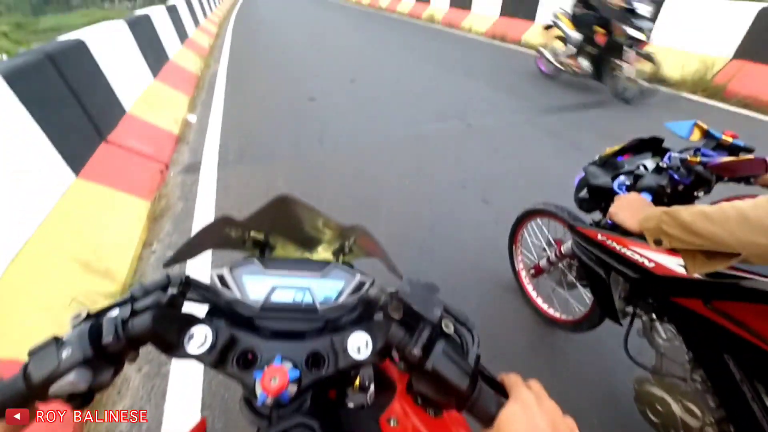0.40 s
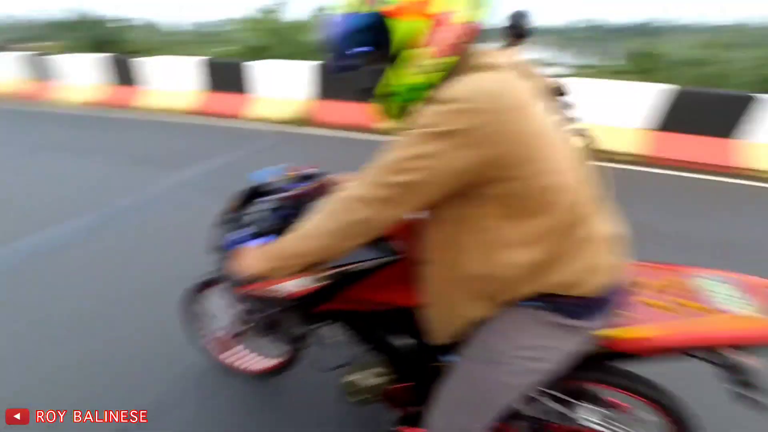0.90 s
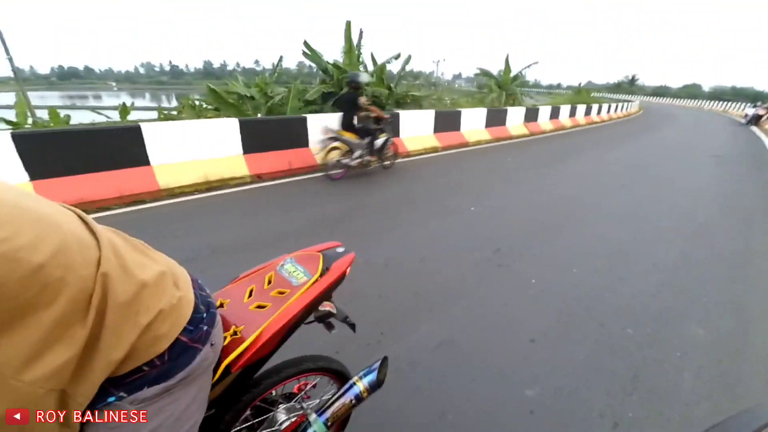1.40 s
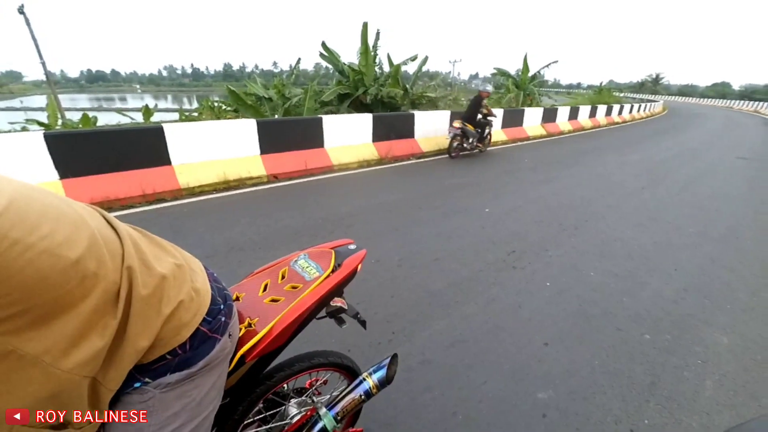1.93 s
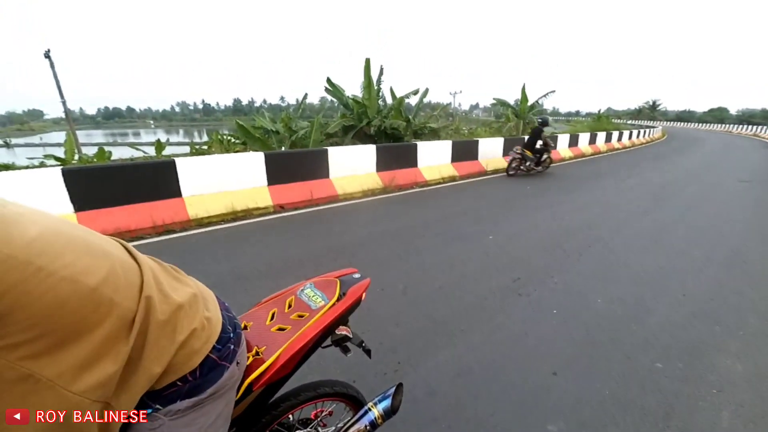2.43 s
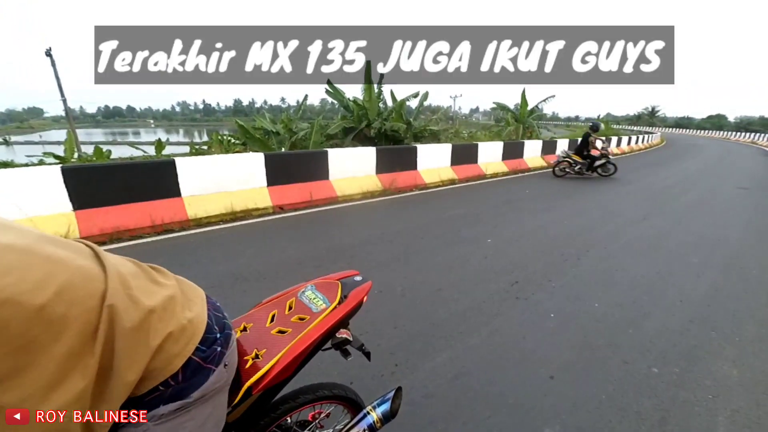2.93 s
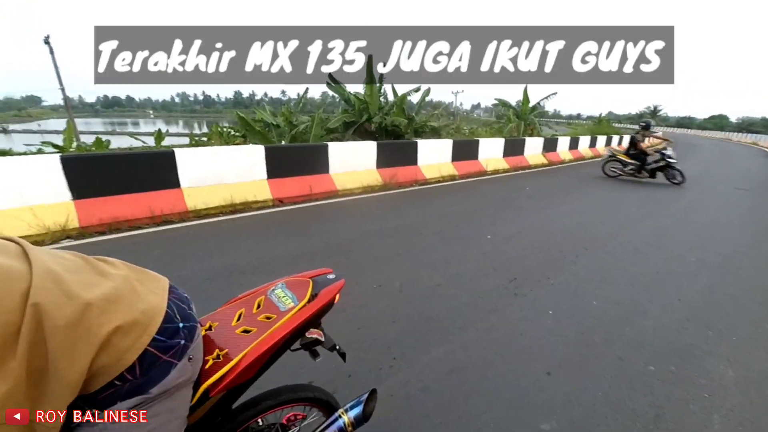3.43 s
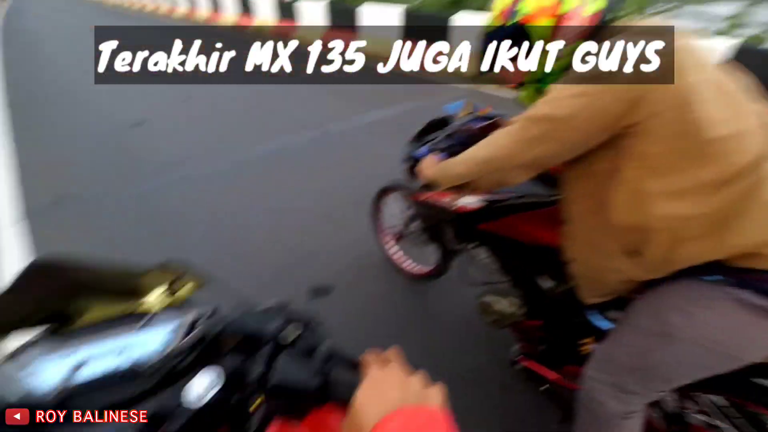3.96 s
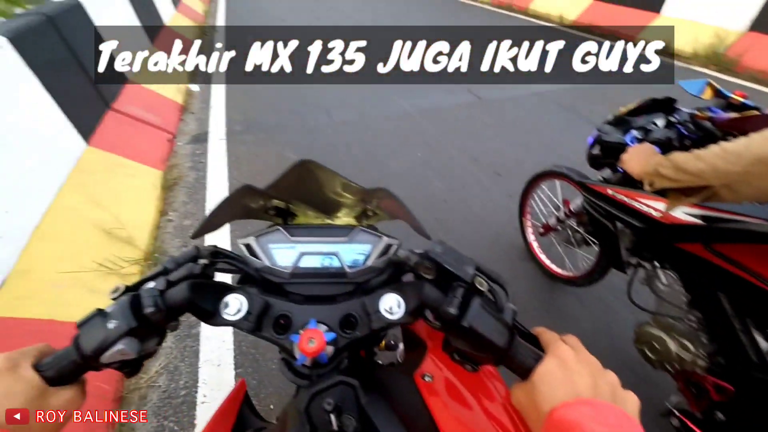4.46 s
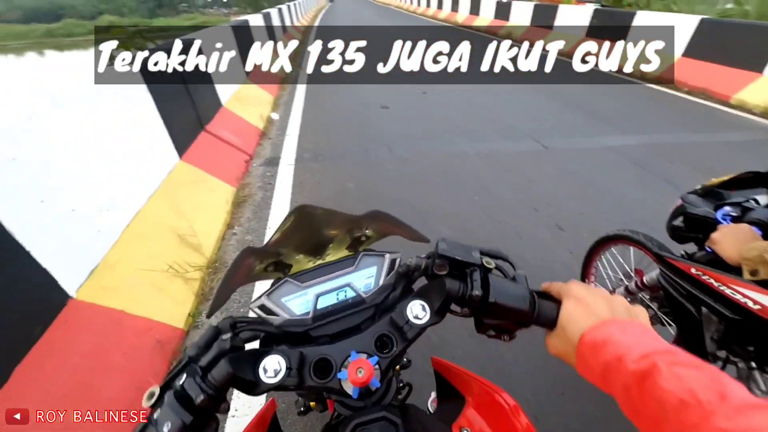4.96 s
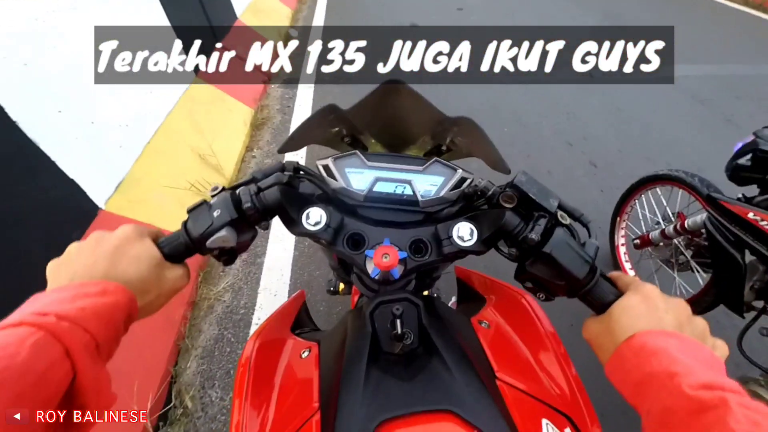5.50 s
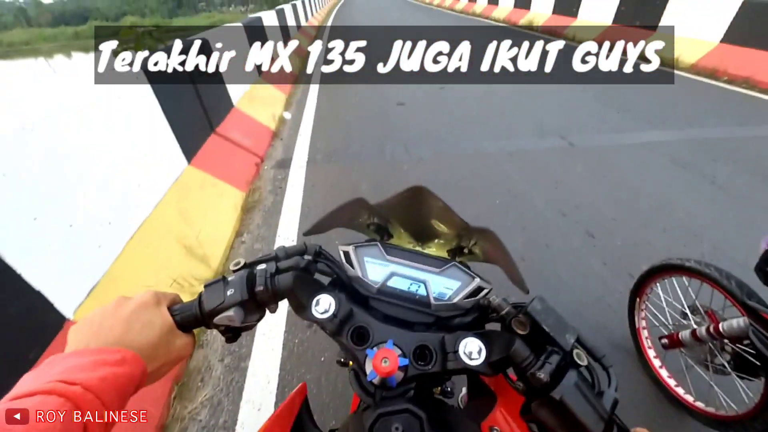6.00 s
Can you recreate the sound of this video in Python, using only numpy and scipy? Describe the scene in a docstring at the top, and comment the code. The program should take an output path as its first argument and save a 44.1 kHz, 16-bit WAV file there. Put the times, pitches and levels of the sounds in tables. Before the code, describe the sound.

Low throaty motorcycle idling beside a rougher second engine that snaps out loud exhaust barks early and midway, over light mechanical ticking.

```python
"""Two idling motorcycles on an open road

Two single-cylinder motorcycles wait side by side, heard from a helmet that turns about. One fires evenly:
pressure pulses ring its pipe and silencer chamber. The other coasts on weak uneven firings that stir its muffler,
and barks when its throttle is blipped. Chords of engine orders hum as the engines run down.
Noise and ticks make the valve clatter above, with thin whirs and hiss; loud peaks touch the recorder's limit."""
import sys
import numpy as np
from scipy import signal
from scipy.io import wavfile
from scipy.ndimage import uniform_filter1d

SR = 44100
rng = np.random.default_rng(int(sys.argv[2]) if len(sys.argv) > 2 else 0)


def to_wav(sig):
    """Store sig (one row per channel, or 1-D mono) as 16-bit WAV at the path in sys.argv[1].

    Samples outside -1..1 are clipped; the rate is SR.
    """
    pcm = np.clip(np.atleast_2d(sig), -1, 1) * 32767
    pcm = np.round(pcm).astype(np.int16)
    wavfile.write(sys.argv[1], SR, pcm.T)  # frames by channels


def gain_from_decibels(decibels):
    """Convert decibel values to linear amplitude factors."""
    exponent = np.asarray(decibels, float) / 20
    return 10 ** exponent


N = 269936  # samples

PIPE_ECHO_S = 0.00804  # return from the far end of the even engine's pipe


def in_time(rows):
    """Columns of a curve, after its time column, at every sample."""
    s, *columns = np.transpose(rows)
    return [np.interp(np.arange(N) / SR, s, c) for c in columns]


def rms_one(x):
    """Scaled to rms 1."""
    return x / np.sqrt(np.mean(x ** 2) + 1e-20)


def clicks(times, sizes):
    """Single-sample pulses at the given times."""
    out = np.zeros(N) + 1e-18
    at = np.round(np.asarray(times) * SR).astype(int)
    inside = (at >= 0) & (at < N)
    np.add.at(out, at[inside], sizes[inside])
    return out


def ring(x, hz, t60):
    """A decaying mode: a unit click sets a sine of height 1 ringing."""
    r, w = gain_from_decibels(-60 / (t60 * SR)), 2 * np.pi * hz / SR
    return signal.lfilter([0, np.sin(w)], [1, -2 * r * np.cos(w), r * r], x)


def strike(modes, times, level_db, tilt_db, spread_db):
    """Every pulse rings every mode with a strength of its own; tilt in dB per octave above the first mode."""
    chance = spread_db * rng.standard_normal((len(times), len(modes)))
    out = 0
    for k, (hz, db, t60) in enumerate(modes):
        octaves = np.log2(hz / modes[0][0])
        strength = gain_from_decibels(level_db + db + tilt_db * octaves + chance[:, k])
        out = out + ring(clicks(times, strength), hz, t60)
    return out


def puffs(times, level_db, t60):
    """An envelope that jumps at each pulse and dies away."""
    return signal.lfilter([1], [1, -gain_from_decibels(-60 / (t60 * SR))], clicks(times, gain_from_decibels(level_db)))


def faded(start, end, fade_s):
    """An envelope that fades in, holds and fades out."""
    t = np.arange(N) / SR
    return np.clip(np.minimum(t - start, end - t) / fade_s, 0, 1)


def echoed(x, delay_s, share):
    """The pulse, then its delayed return."""
    lag = round(delay_s * SR)
    return x + share * np.concatenate([np.zeros(lag), x[:-lag]])


def band(x, low_hz, high_hz):
    """Butterworth band-pass."""
    return signal.sosfilt(signal.butter(2, [low_hz, high_hz], "band", fs=SR, output="sos"), x)


def soften(x, hz):
    """Steep low-pass that rounds off sharp edges."""
    return signal.sosfilt(signal.butter(4, hz, fs=SR, output="sos"), x)


def resonate(x, hz, width_hz):
    """A resonance applied twice; rms 1."""
    r = np.exp(-np.pi * width_hz / SR)
    a = [1, -2 * r * np.cos(2 * np.pi * hz / SR), r * r]
    once = signal.lfilter([1 - r], a, x)
    return rms_one(signal.lfilter([1, 0, -1], a, once))


def drone(glide, orders):
    """An engine that turns evenly sounds its orders as clean gliding tones."""
    hz, level_db = in_time(glide)
    t, turn = np.arange(N) / SR, 2 * np.pi * np.cumsum(hz) / SR
    tones = sum(gain_from_decibels(db) * np.sin(k * turn + rng.uniform(0, 2 * np.pi)) for k, db in orders)
    sounding = (t >= glide[0][0]) * (t <= glide[-1][0])
    return np.sqrt(2) * gain_from_decibels(level_db) * tones * sounding


def even_firings():
    """One firing per completed engine cycle: its time, its level and its brightness."""
    # speed of the even engine: t/s, firings/(1/s)
    speed = [(0, 15.15), (.39, 14.69), (.57, 13.79), (.82, 16.49), (1.54, 15.91), (1.84, 22.02),
             (2.2, 25.32), (2.44, 25.78), (3.01, 23.91), (4.95, 23.77), (5.5, 15.26), (5.94, 25.63),
             (6.14, 20.6)]
    # its pipe as the turning head hears it: t/s, level/dB, brightness/(dB per octave)
    facing = [(0, -18, -6.5), (.4, -14.5, -7), (.63, -20, 2), (0.848, -31, 7), (1.201, -17, -0.5),
              (1.378, -13.5, 1.5), (1.551, -20, 4), (1.749, -16.5, 5), (2.15, -15, 3), (2.85, -15.5, 2),
              (3.348, -17, 4), (3.75, -18, 3), (4.05, -16, -0.5), (4.218, -18, 1.5), (4.35, -13, -4),
              (4.951, -15.5, -0.5), (5.15, -16, -3), (5.6, -16, -3.5), (5.88, -13.5, 2.5), (5.95, -14, 0.5),
              (5.991, -20.5, -4), (6.12, -20, -0.5)]
    # charges that burn weaker or stronger than their neighbours: t/s, change/dB
    uneven = [(1.31, -7), (1.435, -1.5), (1.56, 2), (1.73, -1), (4.09, -14), (5.555, -1)]
    first_firing_s = .0107
    per_s, = in_time(speed)
    cycles, t = np.cumsum(per_s) / SR, np.arange(N) / SR
    cycles = cycles - np.interp(first_firing_s, t, cycles)
    times = np.interp(np.arange(int(cycles[-1]) + 1), cycles, t)
    s, level_db, tilt_db = np.transpose(facing)
    uneven_db = sum(db * (np.abs(times - at) < .015) for at, db in uneven)
    return times, np.interp(times, s, level_db) + uneven_db, np.interp(times, s, tilt_db)


def even_engine(times, level_db, tilt_db):
    """A short push, then a sudden pressure drop that rings the pipe; both return from the pipe end."""
    # modes of the exhaust pipe: f/Hz, level/dB, t60/s
    pipe = [(95, -3, 0.16), (217.8, -6.5, 0.13), (347.8, -8.5, 0.04), (481, -10, 0.032)]
    # how much of the pulse returns from the pipe end: t/s, share
    pipe_return = [(0, 0.68), (1.2, 0.32), (1.55, 0.25), (1.85, 0.56), (2.8, 0.63), (4.0, 0.87),
                   (4.95, 0.52), (5.3, 1), (5.7, 0.55), (6.12, 0.31)]
    times = times + .00008 * rng.standard_normal(len(times))
    level_db = level_db + 1.0 * rng.standard_normal(len(times))  # no two charges burn alike
    push = clicks(times - .0008, gain_from_decibels(level_db + 1.26 * tilt_db + 32.0))
    drop = strike(pipe, times + .0004, level_db + 3, tilt_db, spread_db=.6)
    pulse = echoed(push - drop, PIPE_ECHO_S, in_time(pipe_return)[0])
    mouth = soften(soften(pulse, 484), 730)  # the pipe mouth lets no sharp edge out
    return mouth + chamber(times) + spit(times, level_db + 0.68 * tilt_db)


def chamber(times):
    """The silencer chamber fills as the pulse runs through: two notes swell, fade and return once per firing."""
    # notes that shift as the head turns: t/s, f/Hz, level/dB, upper f/Hz, upper level/dB, swell sharpness
    chamber_notes = [(1.2, 590, -42, 947, -41, 2.5), (1.5, 597, -37, 960, -45, 2.8),
                     (1.8, 614, -24.5, 953, -42, 6.1), (2.199, 658, -30.5, 1018, -43, 1.9),
                     (2.7, 637, -29, 1010, -43.5, 1.7), (3.0, 641, -31, 1050, -51, 2.3),
                     (3.7, 612, -26.5, 950, -57, 7.3), (4.1, 640, -31.5, 823, -42, 4.7),
                     (4.3, 640, -34, 810, -44, 8), (4.599, 643, -30, 792, -40, 8.7),
                     (4.9, 652, -33, 810, -44, 10), (5.05, 667, -44, 810, -52, 6.9),
                     (5.14, 708, -43, 900, -69, 3), (5.25, 684, -44, 980, -54, 3.3),
                     (5.5, 728, -40, 1050, -56, 6.5), (5.9, 738, -27.5, 1120, -43, 5.3),
                     (6.0, 740, -44, 1170, -55, 3.3)]
    # how much of the notes returns: t/s, share
    note_return = [(0, .15), (3.0, .15), (3.7, .4), (4.4, .55), (5.1, .55), (6.12, .3)]
    peak_s, echo_s = .0098, .0102
    s, *columns = np.transpose(chamber_notes)
    t, out = np.arange(SR // 16) / SR, np.zeros(N + SR)
    for start, chance in zip(times, rng.standard_normal((len(times), 4))):
        if start > s[0]:
            hz, level_db, upper_hz, upper_db, sharpness = (np.interp(start, s, c) for c in columns)
            swell = (t / peak_s * np.exp(1 - t / peak_s)) ** sharpness
            hz, upper_hz = hz * (1 + .004 * chance[2]), upper_hz * (1 + .006 * chance[3])
            notes = gain_from_decibels(level_db + 1.2 * chance[0]) * np.sin(2 * np.pi * hz * t)
            notes += gain_from_decibels(upper_db + 2 * chance[1]) * np.sin(2 * np.pi * upper_hz * t)
            at = round(start * SR)
            out[at:at + len(t)] -= swell * notes
    return echoed(out[:N], echo_s, in_time(note_return)[0])


def spit(times, level_db):
    """Gas spits from the pipe mouth at each firing and again with the returning pulse."""
    gate = echoed(puffs(times + .0012, level_db - 28.5, t60=0.018), PIPE_ECHO_S, share=.7)
    return rms_one(band(rng.standard_normal(N), 990, 1400)) * gate


def barks():
    """Full charges burn: a gas-roughened muffler ring, then a snap and rasp, all returned once."""
    # blips of the second engine: t/s, body/dB, crack/dB, return from the pipe end/dB, tailpipe ring/dB
    blips = [(0.009, 0.5, -28, -5, -18), (0.137, -26.5, -57, 7, -62), (0.306, -3, -37.5, -7, -38),
             (0.352, 2, -32.5, -3, -34), (0.396, 7, -29, -17, -33), (0.648, -1, -38.5, -8, -38),
             (0.692, -1, -34.5, -5, -43), (0.733, 6, -30, -34, -28), (0.769, -1, -35.5, -5, -23),
             (0.819, -4, -38, -10, -28), (0.85, -12, -42, -7, -33), (0.879, -12, -60, -13, -27),
             (0.961, -15, -57, -16, -48), (1.173, -11, -37.5, -17, -54), (1.607, -19, -50, -3, -49),
             (1.65, -10, -49, -21, -57), (1.687, -21, -62, -21, -56), (2.618, -12, -44.5, -16, -36),
             (2.658, -11.5, -47, -5, -37), (2.7, -18, -52, -16, -33), (3.239, -16, -35, -12, -24),
             (3.252, -5.5, -34, -32, -4), (3.304, -4, -29.5, -4.5, -7.5), (3.497, 0.5, -29.5, 0, -7),
             (5.827, -27, -43, -10, -31), (5.834, -27, -38.5, -16, -42), (5.841, -11, -49, -0.5, -37),
             (5.943, -20.5, -42, -14, -40)]
    # modes of its open muffler: f/Hz, level/dB, t60/s
    muffler = [(92, -14, 0.0045), (164, -9.5, 0.052), (349.3, -4, 0.04), (515, -9.5, 0.041),
               (642, -39, 0.11)]
    # modes of its tailpipe, loudest when the head faces it: f/Hz, level/dB, t60/s
    tailpipe = [(784, -7, 0.049), (950, -2, 0.017)]
    # modes of the muffler's thin shell, rung by the snap: f/Hz, level/dB, t60/s
    shell = [(1120, -5.5, 0.048), (1360, -7.5, 0.039), (2100, -10, 0.023), (2325, -9, 0.022),
             (3000, -20.5, 0.0063)]
    echo_s = .0118
    s, body_db, crack_db, return_db, ring_db = np.transpose(blips)
    # strong barks carry more bass: dB per octave
    tilt_db = np.tile(-2.5 - 0.2864 * body_db, 2)
    s = np.concatenate([s, s + echo_s])
    body_db, crack_db = (np.concatenate([db, db + return_db]) for db in (body_db, crack_db))
    # the tailpipe has a return balance of its own
    ring_db = np.concatenate([ring_db - 9, ring_db + 0.5 * return_db])

    body = strike(muffler, s + 0.00123, body_db, tilt_db, spread_db=2.0)
    body = body + strike(tailpipe, s + 0.00153, ring_db, 0, spread_db=1.0)
    rough = rms_one(band(rng.standard_normal(N), 160, 790)) * puffs(s + 0.0018, body_db - 18.5, 0.053)
    crunch = rms_one(band(rng.standard_normal(N), 850, 2000)) * puffs(s + 0.0015, crack_db - 1, 0.027)

    snap = strike(shell, s + 0.003, crack_db, 0, spread_db=4.5)
    snap = snap + band(clicks(s + 0.0025, gain_from_decibels(crack_db - 7.0)), 1500, 15000)
    gas = band(rng.standard_normal(N), 2000, 15000)
    gas = rms_one(signal.lfilter([1], [1, -.8], gas))  # the jet noise falls towards the treble
    short_rasp = puffs(s + 0.0028, crack_db - 18.0, 0.0075)
    long_rasp = puffs(s + 0.00052, crack_db - 18.0, 0.085)
    return soften(body + rough, 940) + crunch + snap + gas * (short_rasp + long_rasp)


def coasting():
    """Lean, uneven firings stir only the lowest air volumes of the muffler, over a faint road rumble."""
    # the second engine between barks: t/s, level/dB, brightness/(dB per octave)
    idle = [(0, -20.5, -1.5), (.5, -22, 0), (.9, -25.5, 2), (1.1, -23.5, 0), (1.25, -20, -1),
            (1.4, -22.5, 0.5), (1.86, -28.5, 1.5), (2.5, -27.5, -3.5), (3.1, -24.5, -1), (3.3, -21, -3),
            (3.85, -26, 2.5), (4.0, -27, 3), (4.3, -26, 0), (5.0, -25, -6), (5.4, -26, -3.5),
            (5.6, -23.5, -0.5), (5.8, -23, 1), (5.95, -26.5, -3), (6.12, -31.5, 0)]
    # the air volumes its firings stir: f/Hz, level/dB, t60/s
    lumps = [(62, -9, 0.18), (121.8, -4.5, 0.078), (151, -11, 0.086), (328.5, -8, 0.038), (408, -20, 0.05)]
    firings_per_s = 25.2
    level_db, _ = in_time(idle)
    at = (np.arange(1, 200) + .12 * rng.standard_normal(199)) / firings_per_s
    tilt_db = np.interp(at, *np.transpose(idle)[::2])
    thumps = strike(lumps, at, np.zeros(len(at)), tilt_db, spread_db=2.5)
    road = band(rng.standard_normal(N), 49, 244)
    return gain_from_decibels(level_db) * (rms_one(soften(thumps, 595)) + gain_from_decibels(-6.5) * rms_one(road))


def after_barks():
    """The second engine's chord of engine orders rises briefly after its barks, then falls."""
    # its glide: t/s, firings/(1/s), level/dB
    glide = [(.74, 23.2, -50), (.79, 24.2, -20), (.87, 26.8, -20), (.95, 25.3, -19), (1.05, 23.7, -18.5),
             (1.15, 22.5, -20), (1.21, 21.4, -29), (1.34, 20.2, -36)]
    # engine orders in its chord: order, level/dB
    chord_orders = list(enumerate([-12, -4.5, -5, 0.5, -13, -10, -11, -11, -28, -26, -19, -25.5, -18, -25, -28.5, -25, -25, -23.5, -25, -26],
                    start=2))
    return drone(glide, chord_orders)


def run_downs():
    """Engine hums, throttle shut: orders fall evenly in pitch and fade; the last is the even engine slowing."""
    # start t/s, length/s, firings/(1/s), their fall/(1/s per s), level/dB, orders beside the loudest/dB
    falls = [(0, .3, 21.5, 11.3, -24.5, 2.5), (0.426, 0.24, 27.3, 14, -33, 6),
             (5.961, 0.2, 25, 20, -17.5, -9.5)]
    # engine orders in the hums: order, level/dB
    hum_orders = list(enumerate([-0.5, 0.5, -6.5, -11, -13, -7.5], start=3))
    fade_s, fade_db, loudest_order = 0.055, 27, 4
    out = 0
    for start, length, per_s, fall, db, others_db in falls:
        s = np.array([0, fade_s, length - fade_s, length])
        # a hum that opens the scene has no fade-in
        edge_db = db - fade_db * np.array([start > 0, 0, 0, 1])
        orders = [(k, level_db + others_db * (k != loudest_order)) for k, level_db in hum_orders]
        out = out + drone(np.transpose([start + s, per_s - fall * s, edge_db]), orders)
    return out


def valve_clatter(times, tilt_db):
    """Quarter-octave noise bands swell with every even firing, the low ones most; ticks ride on top."""
    # level of the clatter: t/s, level/dB, bands that start under 1.2 kHz relative to it/dB
    clatter_level = [(0, -59, 2), (.5, -58.5, -2.5), (.89, -59, 7.5), (1.35, -60, -0.5), (2.0, -61.5, 1.5),
                     (2.62, -61.5, -4), (3.4, -61.5, 1), (4.0, -60, 3), (4.3, -60, -9), (5.05, -61.5, -6.5),
                     (5.4, -64.5, -8.5), (5.8, -61.5, -5), (6.12, -61.5, -0.5)]
    # its spectrum before scaling: f/Hz, density/(dB per Hz)
    spectrum = [(600, -7), (900, -6), (1700, -31), (3000, -26.5), (5600, -31.5), (8900, -37.5),
                (13400, -44), (15300, -50)]
    # casings that colour it: f/Hz, width/Hz, level/dB
    casings = [(1114, 110, 4.5), (1354, 185, 1.5), (2207, 430, -1), (3260, 110, -22), (4120, 460, -8),
               (5150, 180, -19), (6700, 1700, -8)]
    clatter_db, low_db = in_time(clatter_level)
    spectrum_hz, spectrum_db = np.transpose(spectrum)
    white = rng.standard_normal((2, N))  # neighbouring bands take different noise
    edges = 600 * 2 ** np.arange(0, 4.7, .25)
    ticks = gain_from_decibels(4.2 * np.minimum(rng.exponential(1, N), 4)) * (rng.random(N) < 60 / SR)  # about 60 a second
    swell = rms_one(uniform_filter1d(puffs(times, 0.7 * tilt_db, 0.2), size=200))
    out = 0
    for k, (low, high) in enumerate(zip(edges, edges[1:])):
        depth = np.clip(1.8 - 0.5 * np.log2(low / 600), 0, 3)
        centre_db = np.interp(np.log(low * high) / 2, np.log(spectrum_hz), spectrum_db)
        gain = gain_from_decibels(centre_db + low_db * (low < 1200))
        swelling = white[k % 2] * (1 + depth * swell) / (1 + depth)
        out = out + gain * band(swelling + 1.0 * ticks, low, high)
    out = out / np.sqrt(np.mean(band(out, 1700, 5800) ** 2))
    shaken = rng.standard_normal(N) * (1 + 1.2 * swell) + 3.4 * ticks
    out = out + sum(gain_from_decibels(db) * resonate(shaken, hz, width) for hz, width, db in casings)
    return gain_from_decibels(clatter_db) * out


def whirs():
    """Brief narrow noises among the clatter that fade in and out and flicker."""
    # start t/s, end t/s, f/Hz, level/dB
    whir_rows = [(3.927, 4.3, 5150, -67), (3.936, 4.27, 3100, -64), (4.92, 5.132, 3900, -65),
                 (5.06, 5.28, 4100, -65)]
    flicker = gain_from_decibels(3 * rms_one(soften(rng.standard_normal(N), 30)))
    out = 0
    for start, end, hz, db in whir_rows:
        noise = resonate(rng.standard_normal(N), hz, width_hz=450)
        out = out + gain_from_decibels(db) * faded(start, end, 0.06) * noise
    return flicker * out


def hiss():
    """Narrow high noise on a steadily sinking floor with a few swells."""
    # start t/s, end t/s, level/dB
    swells = [(1.355, 1.851, -76), (3.938, 4.203, -68), (4.0, 4.42, -73), (4.54, 4.697, -71),
              (4.93, 5.13, -74)]
    start_db, sink_db_per_s = -72, 2
    noise = rms_one(band(band(rng.standard_normal(N), 11500, 14300), 11000, 15000))
    floor = gain_from_decibels(start_db - sink_db_per_s * np.arange(N) / SR)
    return noise * (floor + sum(gain_from_decibels(db) * faded(start, end, fade_s=.11) for start, end, db in swells))


def channel_noise():
    """A trace of white noise and low rumble, opposite in the two channels."""
    rumble = rms_one(band(rng.standard_normal(N), 20, 60))
    return gain_from_decibels(-82.5) * rng.standard_normal(N) + gain_from_decibels(-58.0) * rumble


def scene():
    """Both machines reach one microphone; the two channels differ only by a trace of noise."""
    times, level_db, tilt_db = even_firings()
    mid = even_engine(times, level_db, tilt_db) + barks() + coasting() + after_barks() + run_downs()
    mid = mid + valve_clatter(times, tilt_db) + whirs() + hiss()
    side = channel_noise()
    return np.array([mid + side, mid - side])


def roll_off(x):
    """The treble ends steeply here."""
    return signal.sosfilt(signal.butter(12, 15740, fs=SR, output="sos"), x)


def record(dry):
    """The recorder cuts the lowest bass and the top, and squeezes peaks against its limit."""
    limit = .5  # of full scale
    x = signal.sosfilt(signal.butter(3, 48, "high", fs=SR, output="sos"), dry)
    x = x / (1 + np.abs(x / limit) ** 6) ** (1 / 6)
    x = signal.sosfilt(signal.cheby2(14, 50, 15800, fs=SR, output="sos"), x)
    return roll_off(x)


dry = scene()
out = record(dry)
to_wav(out)
```